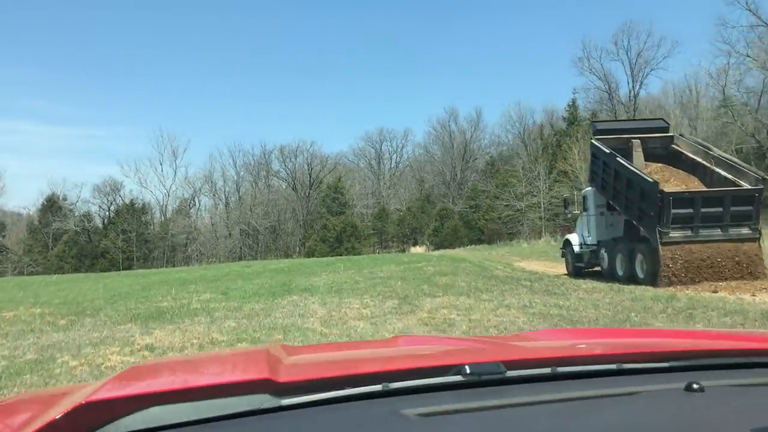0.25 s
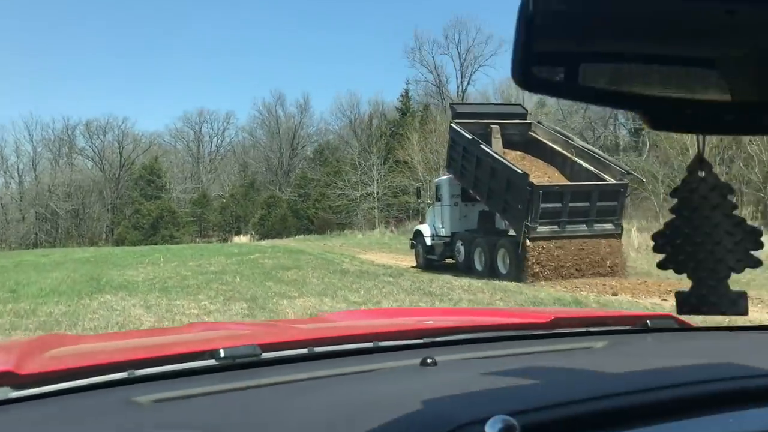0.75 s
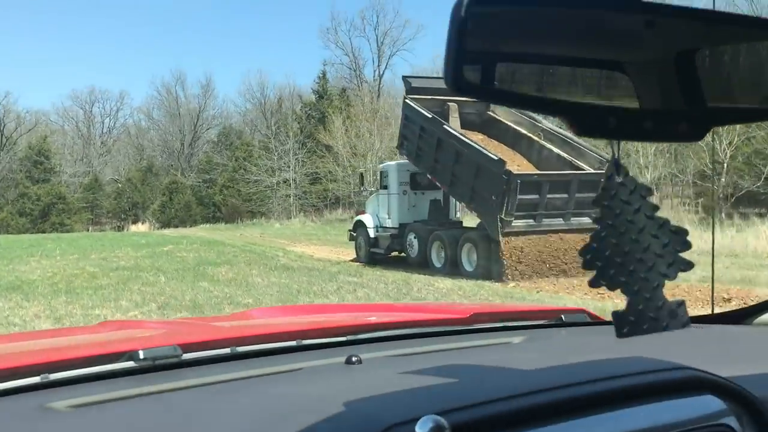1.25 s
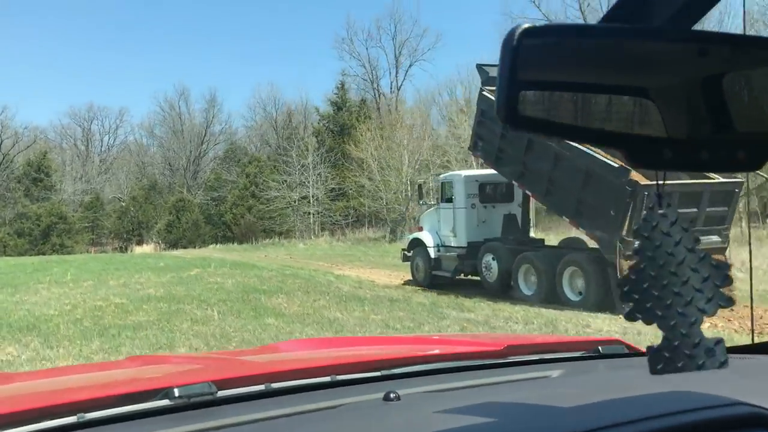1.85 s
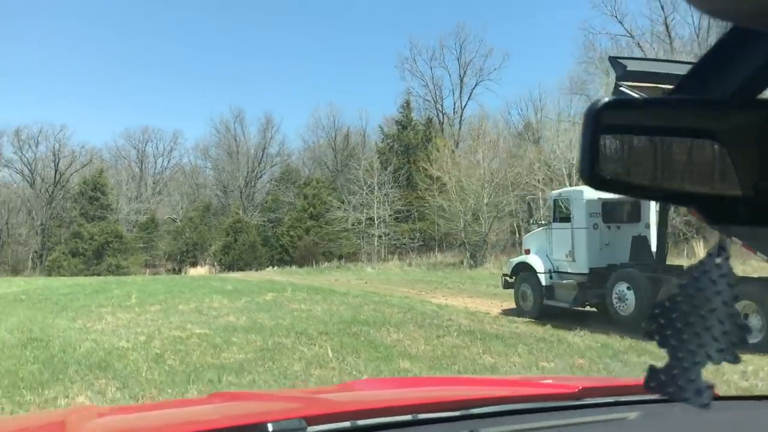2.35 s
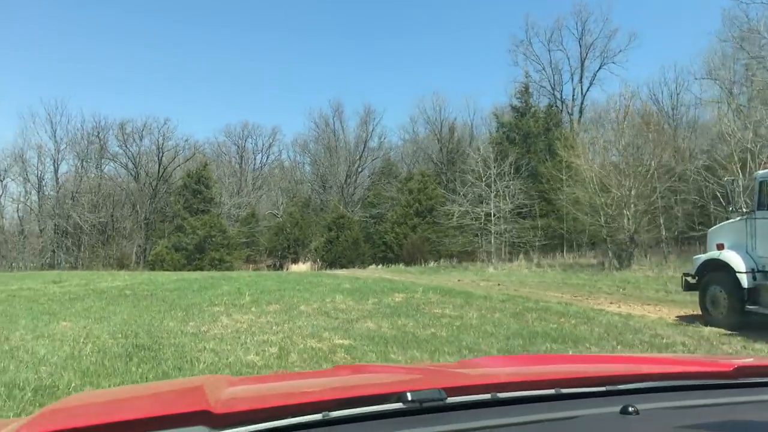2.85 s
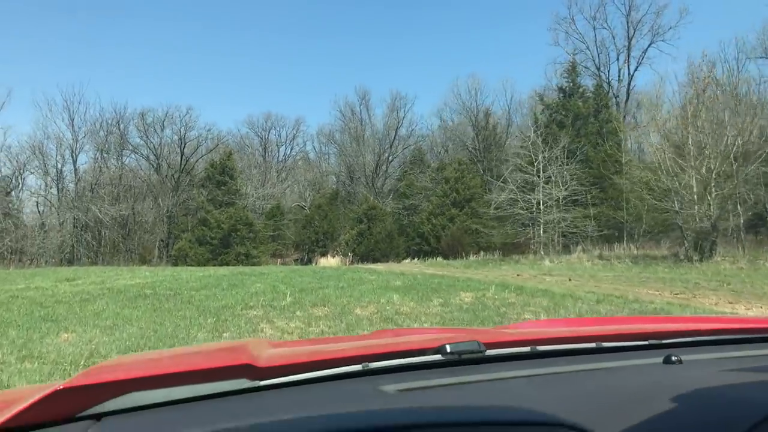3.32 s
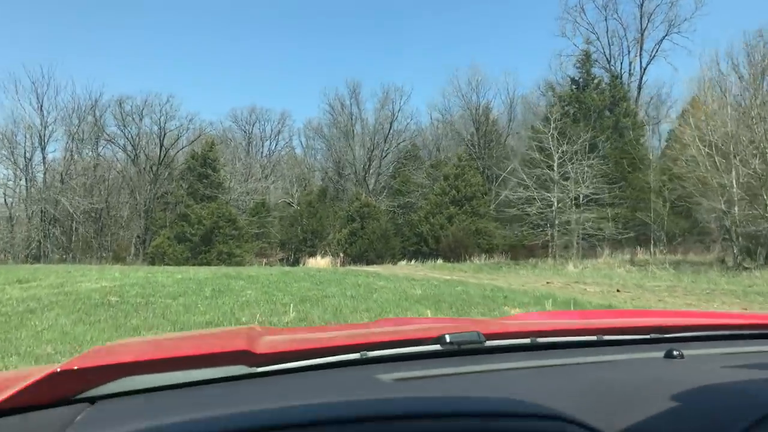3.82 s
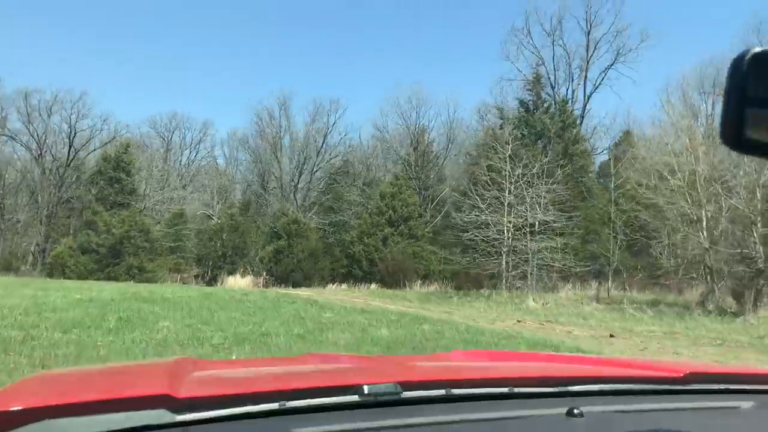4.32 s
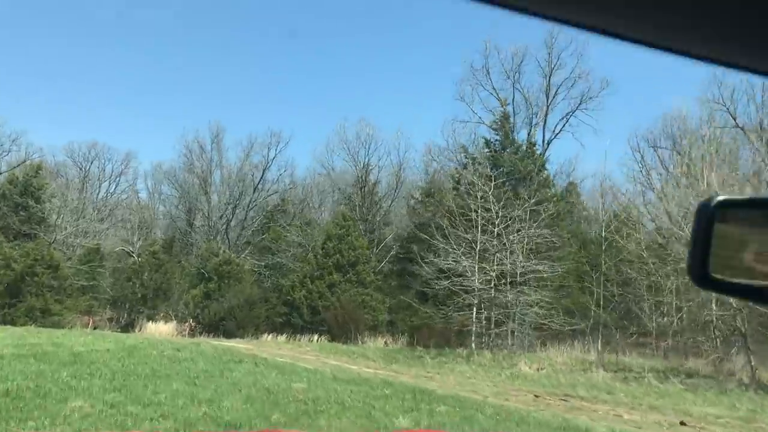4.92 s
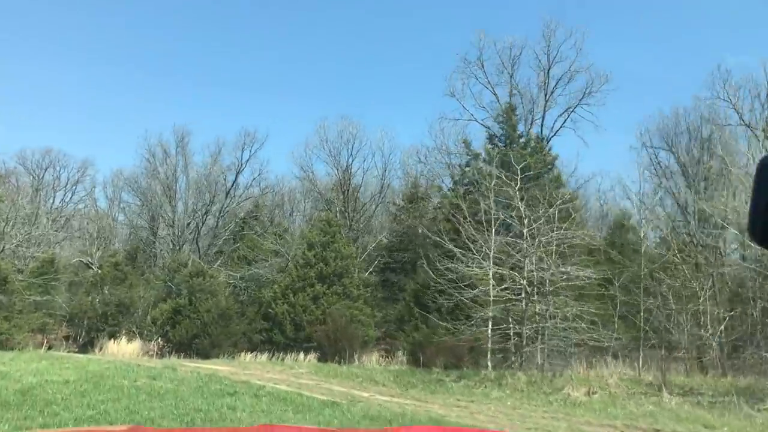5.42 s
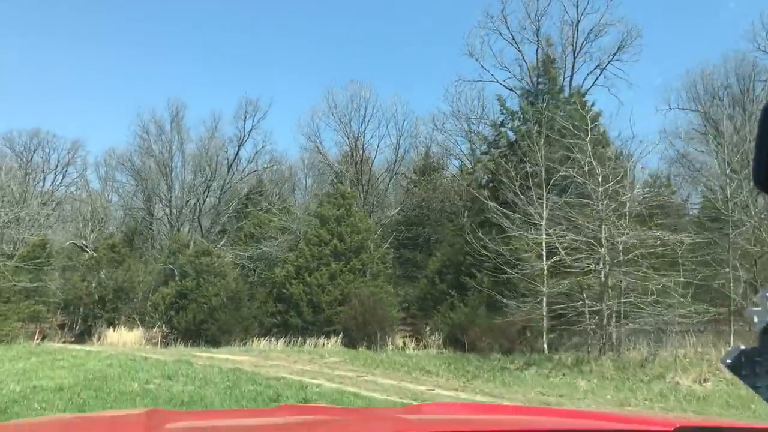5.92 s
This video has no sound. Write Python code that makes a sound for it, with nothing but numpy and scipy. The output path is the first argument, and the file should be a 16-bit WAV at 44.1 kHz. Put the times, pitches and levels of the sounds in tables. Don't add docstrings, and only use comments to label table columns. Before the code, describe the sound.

Heard inside a closed, padded cab through a phone-like microphone, a pickup rolls slowly over rough ground. A very low boom heaves with the bumps, heaviest in the first second, over floor thuds, a dull tyre and fan roar and a weak engine hum. Loose plastic rattles early, again near the middle and later, with tiny metallic tinkles, faint cloth rustle and soft suspension thumps.

```python
import sys
import numpy as np
from scipy import signal
from scipy.fft import rfft, irfft
from scipy.io import wavfile
from scipy.ndimage import uniform_filter1d

SR = 44100
rng = np.random.default_rng(int(sys.argv[2]) if len(sys.argv) > 2 else 0)


def transcribe(signal):
    frames = np.atleast_2d(signal).T
    limited = np.clip(frames, -1, 1)
    pcm = np.round(limited * 32767).astype(np.int16)
    wavfile.write(sys.argv[1], SR, pcm)


def gain_from_db(level_db):
    decades = np.asarray(level_db, float) / 20
    return 10 ** decades


N = 271897


def white():
    return rng.standard_normal(N)


def rms_one(x):
    return x / np.sqrt(np.mean(x ** 2) + 1e-20)


def in_time(rows):
    s, *columns = np.transpose(rows)
    return [np.interp(np.arange(N) / SR, s, column) for column in columns]


def drift(rate):
    r = np.exp(-80 * np.pi * rate / SR)
    coarse = rng.standard_normal(N // 40 + 2002)
    slow = signal.lfilter([1], [1, -2 * r, r * r], coarse)[2000:]
    return np.interp(np.arange(N) / 40, np.arange(len(slow)), rms_one(slow))


def swells_db(rows, rest_db):
    t = np.arange(N) / SR
    power = gain_from_db(2 * rest_db)
    for s, half_s, db in rows:
        power = power + gain_from_db(2 * db) * np.exp(-2 * ((t - s) / half_s) ** 2)
    return 10 * np.log10(power)


def resonance(x, hz, width_hz):
    r = np.exp(-np.pi * width_hz / SR)
    top = np.array([1, 0, -1]) * (1 - r * r) / 2
    return signal.lfilter(top, [1, -2 * r * np.cos(2 * np.pi * hz / SR), r * r], x)


def twice_resonance(x, hz, width_hz):
    return resonance(resonance(x, hz, width_hz), hz, width_hz)


def coloured(spectrum, source):
    hz = np.arange(N // 2 + 1) * SR / N + .1
    points_hz, points_db = np.transpose(spectrum)
    gain_db = np.interp(np.log(hz), np.log(points_hz), points_db)
    return irfft(rfft(source) * gain_from_db(gain_db), N)


def levelled(x, window_s, share):
    power = uniform_filter1d(rms_one(x) ** 2, int(window_s * SR))
    power = uniform_filter1d(power, size=600)
    return rms_one(x / (power + 0.011) ** (share / 2))


def gravel(per_s, spread_db):
    sizes = gain_from_db(spread_db * np.minimum(rng.exponential(1, N), 4)) * rng.choice([-1, 1], N)
    return rms_one(sizes * (rng.random(N) < per_s / SR))


def place(out, s, sound):
    start = round(s * SR)
    out[start:start + len(sound)] += sound


# (time [s], level over the mean [dB])
ROUGHNESS = [(0, 6.5), (.14, 2.5), (.26, 2), (.5, 5), (.8, -1), (1.0, -4), (1.4, -0.5), (1.9, -1.5),
             (2.1, 0.5), (2.75, 0.5), (2.95, -4), (3.15, 3), (3.8, -0.5), (4.5, 3), (4.85, 0), (5.3, 3.5),
             (5.55, -0.5), (6.17, 1.5)]
# (centre [s], half length [s], level [dB])
BOOM_SWELLS = [(.05, 0.046, -20), (.3, 0.074, -18), (.4, 0.046, -15), (.5, 0.05, -12.5), (.64, 0.067, -13.5),
               (.76, 0.078, -19.5), (.97, 0.2, -19.5), (1.29, 0.08, -19), (1.385, 0.018, -15), (1.53, 0.059, -17),
               (1.9, 0.071, -17.5), (2.11, 0.039, -16), (2.26, 0.047, -25), (2.48, 0.12, -23.5),
               (2.82, 0.043, -22), (3.12, 0.078, -44), (3.3, 0.079, -28.5), (3.57, 0.044, -19),
               (3.83, 0.098, -21), (4.02, 0.11, -26), (4.28, 0.051, -16), (4.465, 0.032, -15.5),
               (4.6, 0.092, -28), (4.935, 0.03, -16.5), (5.07, 0.048, -23.5), (5.17, 0.02, -13.5),
               (5.3, 0.035, -19), (5.59, 0.04, -19), (5.95, 0.21, -20.5), (6.16, 0.033, -22)]
# (centre [s], half length [s], level change [dB])
FLOOR_SURGES = [(.05, 0.096, 2.5), (0.545, .15, 2), (1.12, 0.089, 4.5), (1.72, .07, 1.5), (1.9, 0.057, -4),
                (2.547, .1, -4), (2.97, 0.092, -0.5), (3.406, 0.037, 3), (3.93, 0.073, 3.5), (4.254, 0.073, -5),
                (4.751, 0.073, 1), (5.176, 0.07, -2), (5.45, 0.043, 2), (6.03, .05, 4)]


def ground():
    rough_db, = in_time(ROUGHNESS)
    rest_db = -27 + 0.49 * rough_db
    boom_db = swells_db(BOOM_SWELLS, rest_db)
    t = np.arange(N) / SR
    surge_db = sum(db * np.exp(-((t - s) / half_s) ** 2) for s, half_s, db in FLOOR_SURGES)
    thud_db = -35.5 + rough_db + surge_db + 0.17 * (boom_db - rest_db)
    roar_db = -46 + 0.17 * rough_db
    return boom_db, thud_db, roar_db


# (frequency [Hz], level per Hz [dB])
BOOM = [(3, -31), (7, -3), (14, -1), (24, 9), (33, 1.5), (42, -12.5), (60, -21), (80, -55), (130, -120)]


def springs(boom_db):
    return gain_from_db(boom_db) * levelled(coloured(BOOM, white()), window_s=.08, share=.85)


# (frequency [Hz], level per Hz [dB])
THUD = [(26, -38), (45, 4.5), (64, -2), (92, -10), (103, -11.5), (150, -16), (200, -17), (280, -23.5),
        (360, -64), (620, -120)]


def floor_pan(thud_db):
    thud = levelled(coloured(THUD, white()), window_s=0.068, share=0.23)
    thud = thud + 0.99 * resonance(thud, hz=127.5, width_hz=25.6)
    return gain_from_db(thud_db) * rms_one(thud)


# (time [s], frequency [Hz], level [dB])
ENGINE = [(0, 82.9, -67), (.5, 78.96, -33), (1.1, 76, -48.5), (2, 80.6, -42), (2.7, 83.46, -42.5),
          (3.3, 92.5, -64), (3.7, 91.1, -42.5), (4.2, 90.9, -40), (4.8, 90.86, -60), (5.4, 92.5, -41),
          (6.17, 92.3, -37.5)]


def engine():
    hz, level_db = in_time(ENGINE)
    turn = 2 * np.pi * np.cumsum(hz * (1 + 0.01225 * drift(5.1))) / SR
    orders = np.sin(turn) + gain_from_db(-15) * np.sin(2 * turn)
    return np.sqrt(2) * gain_from_db(level_db + 3.5 * drift(6.6)) * orders


def closing_fade():
    left_s = (N - np.arange(N)) / SR
    return np.sin(np.pi / 2 * np.clip(left_s / .03, 0, 1))


# (frequency [Hz], width [Hz], lift [dB])
CAB = [(316.7, 20, 5), (542.6, 14, 4), (569, 36, 0.5), (710, 45, 3.5), (817, 62, 7), (1388, 80, 3.5),
       (1588, 48, 6.5), (1976, 41, -7), (2133, 71, 5.5), (3070, 24, 4.5), (4450, 160, 3.5), (4750, 91, 4.5)]


def through_cab(x):
    for hz, width_hz, lift_db in CAB:
        x = x + (gain_from_db(lift_db + 1.28 * drift(1.95)) - 1) * resonance(x, hz, width_hz)
    return x


# (frequency [Hz], level per Hz [dB])
ROAR = [(140, -40), (240, -7), (288, -4.5), (320, -1.5), (356, -3), (490, -9), (553, -4.5), (605, -4.5),
        (807, -14), (1080, -17), (1600, -22), (1950, -22.5), (2160, -24), (3570, -26), (9000, -54),
        (11700, -89), (19800, -120)]
# (centre [s], half length [s], level over the roar [dB])
HUMS = [
    (.85, 1, -6),
    (2.4, .3, -26),
    (4.1, 0.19, 0),
    (4.75, 1, -7.5),
    (6.1, 0.32, -14),
]


def roar(roar_db):
    tread = white() + 0.37 * gravel(per_s=1500, spread_db=2.5)
    rush = rms_one(through_cab(coloured(ROAR, tread * gain_from_db(0.68 * drift(25)))))
    drone = rms_one(twice_resonance(white(), hz=322, width_hz=18))
    return gain_from_db(roar_db) * (rush + gain_from_db(swells_db(HUMS, rest_db=-27)) * drone)


def dashboard():
    mode = twice_resonance(white(), hz=554, width_hz=42)
    return gain_from_db(-55.5 + 2.0 * drift(3.0)) * levelled(mode, window_s=.02, share=0.66)


# (frequency [Hz], level per Hz [dB])
HISS = [(2940, -27), (5000, -1.5), (6600, -9), (8670, -11.5), (9730, -13.5), (16400, -17.5), (17500, -26.5)]


def microphone_hiss():
    return gain_from_db(-72) * rms_one(coloured(HISS, white() * gain_from_db(0.98 * drift(11))))


# (centre [s], half length [s], level [dB])
RUSTLE = [(0.055, 0.049, -66), (0.157, 0.025, -66), (0.41, .07, -64), (0.56, 0.088, -68.5),
          (2.947, 0.071, -70), (3.725, 0.017, -70), (3.78, 0.029, -69), (3.894, .015, -63.5),
          (3.962, 0.048, -62), (4.035, .035, -67), (4.079, 0.018, -71), (5.386, 0.021, -70),
          (6.001, 0.017, -63), (6.147, 0.052, -83)]
# (frequency [Hz], level per Hz [dB])
CLOTH = [(2350, -29), (4000, -1), (5830, -7.5), (7420, -10), (9440, -14), (13600, -17), (17500, -19)]


def cloth_rustle():
    t = np.arange(N) / SR
    swells = sum(gain_from_db(db) * np.exp(-((t - s) / half_s) ** 4) for s, half_s, db in RUSTLE)
    grains = white() * gain_from_db(2.3 * drift(60)) + .4 * gravel(per_s=2300, spread_db=8.0)
    return swells * rms_one(coloured(CLOTH, grains))


def body(x, modes):
    return sum(gain_from_db(db) * resonance(x, hz, width_hz) * (-1) ** k for k, (hz, width_hz, db) in enumerate(modes))


# (frequency [Hz], width [Hz], level [dB])
TRIM = [(2520, 72, 2), (2900, 390, 2.5), (3710, 510, 0.5), (4450, 370, 0.5), (5000, 420, 3.5),
        (5530, 2250, -3.5)]
# (frequency [Hz], width [Hz], level [dB])
PANEL = [(580, 97, -4.5), (716, 125, 2.5), (997, 75, -3.5), (1367, 76, 4.5), (1660, 230, -5),
         (1920, 98, -1.5), (2220, 170, -14)]


def trim(contacts, t60, ring_width_hz, dull_hz, trim_db):
    out, t = np.zeros(N + 8192), np.arange(8192) / SR
    dull = signal.butter(2, dull_hz, fs=SR, output="sos")
    broad = signal.butter(2, [600, 2700], "band", fs=SR, output="sos")
    edge = signal.butter(2, 5800, "high", fs=SR, output="sos")
    for s, peak_db, ring_hz, body_db, edge_db, ring_db in contacts:
        fading = gain_from_db(-60 * t / t60) + gain_from_db(-14.0 - 60 * t / 0.13)
        burst = rng.standard_normal(8192) * fading
        burst[10:13] += [1.2, 2.2, 0.9]
        hit = gain_from_db(trim_db) * signal.sosfilt(dull, body(burst, TRIM))
        hit += gain_from_db(ring_db + 6.0) * resonance(burst, ring_hz, ring_width_hz)
        hit += gain_from_db(body_db + 12.5) * (body(burst, PANEL) + 0.073 * signal.sosfilt(broad, burst))
        hit += gain_from_db(body_db + 7) * signal.sosfilt(broad, np.arange(8192) == 11)
        bright = signal.sosfilt(edge, burst)
        hit += gain_from_db(edge_db) * (0.6 * bright + 1.56 * resonance(bright, hz=7300, width_hz=870))
        place(out, s, gain_from_db(peak_db - 3.0) * hit)
    return out[:N]


# (time [s], peak [dB], ring [Hz], ring level [dB])
TICKS = [(0.055, -57, 4170, 2), (0.1166, -55, 5400, 18.5), (0.1294, -56, 5370, -3), (0.2944, -56, 4380, 0),
         (0.3335, -52, 4200, 4), (1.3734, -52, 4950, -2), (1.6404, -55, 4387, -1), (2.9445, -54, 4840, 5),
         (3.7653, -55, 5100, 4), (5.212, -50, 5370, 2), (5.757, -52, 5130, 0), (5.998, -55, 5297, 0),
         (6.0687, -58, 4170, -5)]
# (time [s], peak [dB], ring [Hz], panel level [dB], bright edge [dB])
RATTLES = [
    (0.248, -35, 4870, -1, -7),
    (0.2685, -35, 4930, -3, -12),
    (0.2866, -39, 5670, 5, -18),
    (0.824, -43.5, 5300, 2, -15),
    (2.715, -35.5, 4850, -0.5, -15),
    (2.7344, -45, 4440, 2, -11),
    (3.908, -43, 4450, -21, -23),
    (5.2889, -48, 5000, 10, -28),
    (5.7325, -46.5, 4610, 9.5, -14),
]
# (time [s], peak [dB], ring level [dB])
CHATTER = [
    (3.1571, -38.5, -6),
    (3.174, -43, 0),
    (3.1787, -40, -5),
    (3.1894, -44, -3),
    (3.1961, -43, 1),
    (3.2075, -43, -3),
    (3.2284, -50, 0),
]


def thin_trim():
    clip_hz = 4450
    contacts = [(*row, -16) for row in RATTLES]
    contacts += [(s, db, clip_hz, -0.5, -21, ring_db) for s, db, ring_db in CHATTER]
    for s, db, hz, ring_db in TICKS:
        thinner_db = 20 * np.log2(hz / clip_hz)
        contacts.append((s, db, hz, -7 - .4 * thinner_db, -14.5 + thinner_db, ring_db))
    return trim(sorted(contacts), t60=0.049, ring_width_hz=200, dull_hz=7200, trim_db=3.0)


# (time [s], frequency [Hz], peak [dB])
TINKLES = [(.117, 10600, -66), (.126, 5350, -55), (.133, 9000, -67), (.228, 14050, -65), (.252, 14050, -49),
           (.254, 16600, -50), (0.269, 16600, -62), (.333, 16400, -64), (.333, 10400, -66),
           (.44, 13000, -73), (.824, 14050, -66), (2.699, 16700, -56), (2.708, 16750, -54),
           (2.7135, 16950, -60), (2.781, 16600, -62), (3.163, 16700, -60), (3.178, 8550, -60),
           (3.217, 14100, -72), (4.333, 16600, -62), (5.212, 9700, -63), (5.735, 16570, -68)]


def tinkles():
    out, t = np.zeros(N + 8192), np.arange(8192) / SR
    beating = 1 + 0.37 * np.sin(2 * np.pi * 90 * t)
    shape = (1 - np.exp(-t / .001)) * gain_from_db(-60 * t / 0.039) * beating
    for s, hz, peak_db in TINKLES:
        place(out, s, gain_from_db(peak_db) * shape * np.sin(2 * np.pi * hz * t))
    return out[:N]


def strike_mode(out, s, hz, peak_db, t60):
    t = np.arange(2048) / SR
    shape = gain_from_db(peak_db + 1 - 60 * t / t60) * (1 - np.exp(-t / 0.00034))
    place(out, s, shape * np.sin(2 * np.pi * hz * t))


# (frequency [Hz], time to fall 60 dB [s])
SNAP_MODES = [
    (1500, 0.0073),
    (3050, 0.01),
    (4650, 0.011),
    (7600, 0.0066),
]
# (time [s], then the peak of each stiff mode, low to high [dB])
SNAPS = [(.248, -26, -33, -50, -36), (0.252, -36, -45, -44, -51), (.2575, -50, -52, -41, -55),
         (0.2647, -46, -42, -39, -60), (0.268, -27, -46, -39, -54), (0.286, -32, -50, -40, -50),
         (0.2912, -33, -48, -50, -56), (0.8234, -32.5, -58, -41, -60), (.838, -64, -53, -64, -70),
         (2.6993, -28, -50, -39, -41), (2.7008, -43, -45, -41, -38), (2.7152, -34, -56, -41, -48),
         (2.7205, -42, -48, -40, -52), (2.7255, -48, -53, -45, -54), (3.1565, -32, -41, -56, -46),
         (3.1606, -37, -48, -52, -56), (3.173, -50, -48, -58, -56), (3.1794, -48, -45, -58, -54),
         (3.194, -48, -48, -58, -58), (3.2085, -48, -54, -60, -62), (4.3329, -36, -60, -54, -56),
         (4.346, -47, -40, -58, -60), (5.2894, -40, -47, -53, -64), (5.732, -42, -49, -49, -54),
         (5.7391, -48, -56, -60, -62), (5.9953, -58, -60, -60, -60)]
# (time [s], frequency [Hz], peak [dB])
PINGS = [(0.249, 4870, -39), (.2532, 4950, -42), (.2568, 3050, -41), (0.253, 1350, -30), (0.275, 3100, -46),
         (.2905, 6000, -48), (.8385, 3060, -40), (2.7195, 4800, -41), (2.719, 1790, -42),
         (5.761, 4100, -53), (5.7575, 5125, -53), (.2693, 5140, -37), (.2868, 5900, -43),
         (.2945, 5400, -50), (.8235, 5760, -48), (.829, 5000, -50), (.8235, 3100, -50), (2.6988, 3240, -34),
         (2.6995, 8300, -40), (2.7175, 7800, -45), (2.7245, 6300, -50), (2.7245, 3300, -51),
         (2.7385, 6800, -52), (2.7045, 5870, -42), (2.7037, 1100, -40), (2.711, 3530, -45),
         (2.7345, 5600, -47), (3.1564, 4440, -39), (3.157, 1950, -42), (3.1732, 4430, -40),
         (3.1772, 4400, -36), (3.1785, 8400, -53), (3.183, 4470, -43), (3.1915, 4600, -45),
         (3.1945, 4400, -39), (3.2, 4370, -43), (3.2085, 4460, -43), (3.2165, 4350, -50),
         (3.229, 4200, -56), (3.174, 7300, -52), (3.19, 6500, -54), (3.197, 7000, -57), (4.3325, 3780, -34),
         (4.332, 3100, -35), (4.3348, 2980, -40), (4.3415, 3350, -45), (4.349, 3600, -48),
         (4.358, 3150, -50), (4.3355, 4450, -41), (4.3465, 1600, -41), (4.333, 8110, -50),
         (4.334, 7400, -54), (4.338, 3820, -46), (4.336, 1090, -44), (5.2925, 5000, -53), (5.3, 3200, -49),
         (5.7335, 2510, -46), (5.9945, 4950, -51), (5.997, 5400, -51), (5.997, 6870, -54)]


def snaps():
    out = np.zeros(N + 2048)
    for s, hz, db in PINGS:
        strike_mode(out, s, hz, db, t60=0.014)
    detunes = rng.normal(1, 0.036, (len(SNAPS), len(SNAP_MODES)))
    for (s, *peaks_db), detune in zip(SNAPS, detunes):
        for (hz, t60), db, off in zip(SNAP_MODES, peaks_db, detune):
            strike_mode(out, s, hz * off, db, t60)
    return out[:N]


# (time [s], peak [dB], frequency [Hz])
PANEL_HITS = [(.249, -28.5, 805), (.2682, -25.5, 550), (.272, -31, 790), (.2895, -30, 660),
              (.8235, -37, 785), (2.7005, -28, 760), (2.7195, -30, 740), (2.7375, -31, 765),
              (3.157, -29.5, 775), (3.179, -38, 720), (4.3325, -38, 716), (5.7323, -35, 770)]


def landings():
    out, t = np.zeros(N + 4096), np.arange(4096) / SR
    shape = (1 - np.exp(-(t / 0.0031) ** 2)) * gain_from_db(-60 * t / 0.016)
    for s, peak_db, hz in PANEL_HITS:
        place(out, s, gain_from_db(peak_db + 9) * shape * np.sin(2 * np.pi * hz * t))
    return out[:N]


# (time [s], peak [dB], ring [Hz], panel level [dB], bright edge [dB])
KNOCKS = [
    (0.2532, -35, 3070, -7, -18),
    (0.838, -50, 3350, -12, -22),
    (2.699, -31, 3060, -6, -7),
    (2.7034, -41, 2900, 1, -13),
    (4.3325, -39, 3400, 1.5, -9),
    (4.3444, -39, 3120, -8, -36),
    (4.3567, -48, 3300, 1, -22),
    (5.3085, -47.5, 3250, 2, -20),
]


def thick_trim():
    contacts = [(*row, 1.5) for row in KNOCKS]
    return trim(contacts, t60=0.042, ring_width_hz=290, dull_hz=4600, trim_db=4.0)


# (time [s], peak [dB], frequency [Hz])
THUMPS = [
    (0.377, -20, 236),
    (0.848, -22, 285),
    (1.032, -26, 247),
    (2.959, -23.5, 226),
    (4.342, -32, 272),
]


def thumps():
    out, t = np.zeros(N + 8192), np.arange(8192) / SR
    shape = (1 - np.exp(-t / 0.0021)) * gain_from_db(-60 * t / 0.032)
    for s, peak_db, hz in THUMPS:
        place(out, s, gain_from_db(peak_db) * shape * np.sin(2 * np.pi * hz * t))
    return out[:N]


def scene():
    boom_db, thud_db, roar_db = ground()
    mix = closing_fade() * (springs(boom_db) + floor_pan(thud_db) + engine())
    mix += roar(roar_db) + dashboard()
    mix += microphone_hiss() + cloth_rustle()
    mix += thin_trim() + tinkles() + snaps()
    mix += landings() + thick_trim() + thumps()
    return mix[None]


def roll_off(x):
    return signal.sosfilt(signal.butter(12, 18220, fs=SR, output="sos"), x)


def record(dry):
    top_cut = signal.ellip(12, .5, 60, 17150, fs=SR, output="sos")
    cut = signal.sosfilt(top_cut, dry)
    return roll_off(cut)


dry = scene()
out = record(dry)
transcribe(out)
```